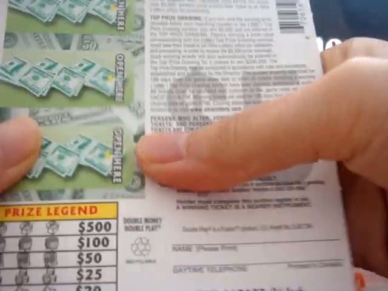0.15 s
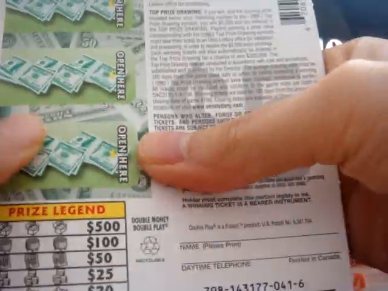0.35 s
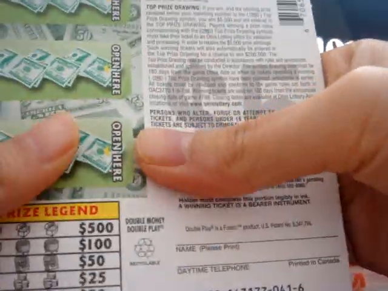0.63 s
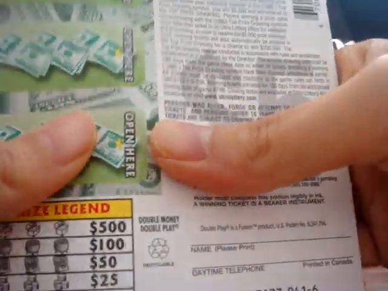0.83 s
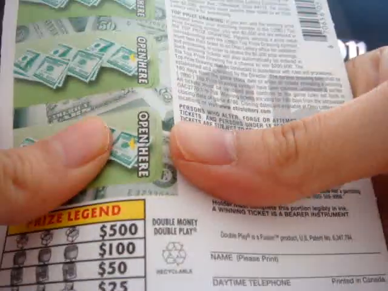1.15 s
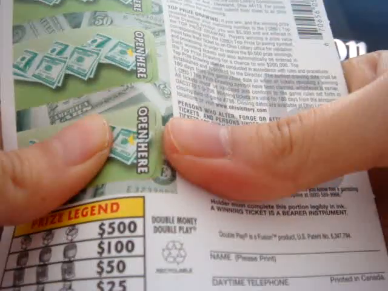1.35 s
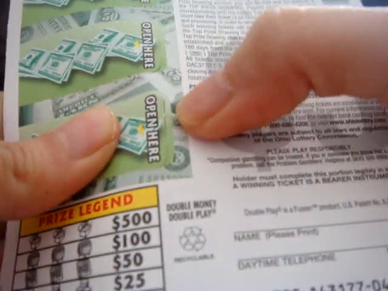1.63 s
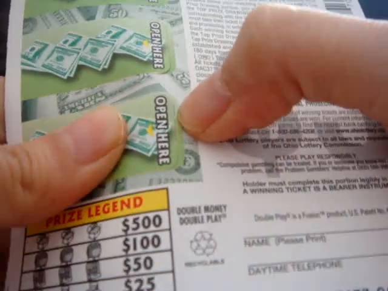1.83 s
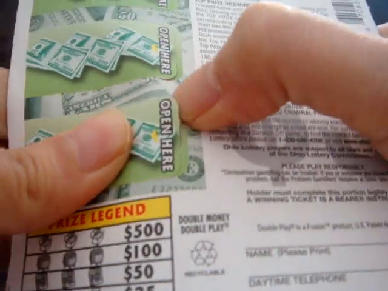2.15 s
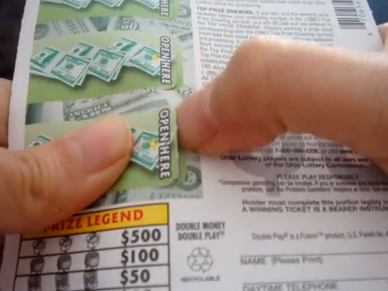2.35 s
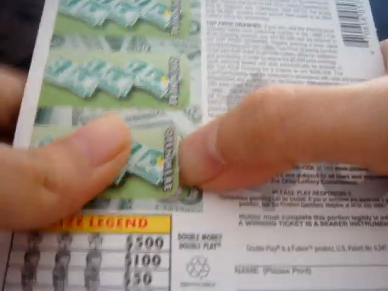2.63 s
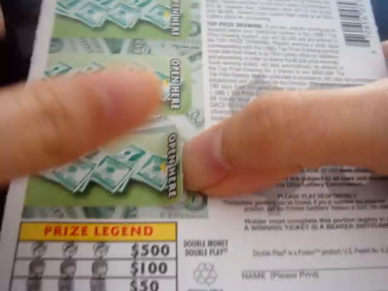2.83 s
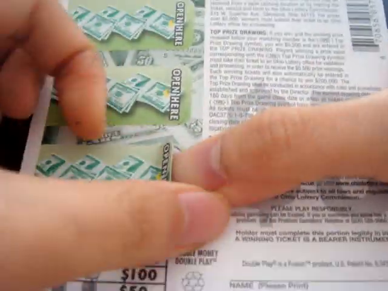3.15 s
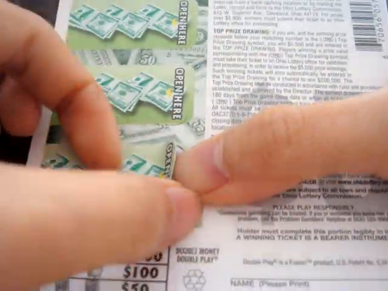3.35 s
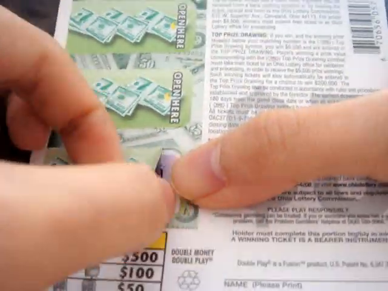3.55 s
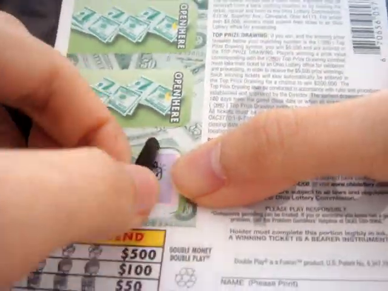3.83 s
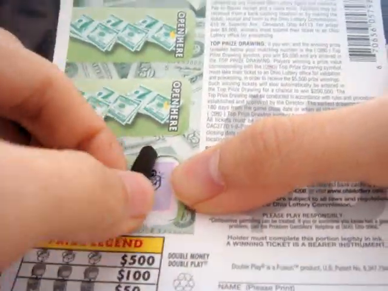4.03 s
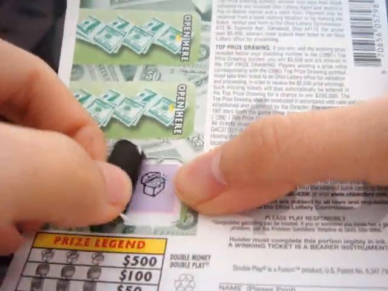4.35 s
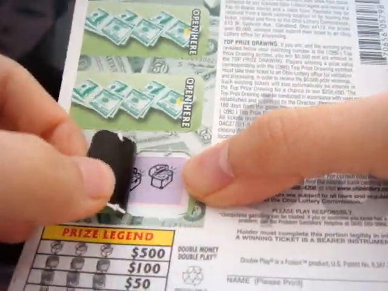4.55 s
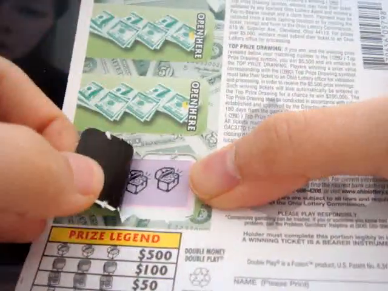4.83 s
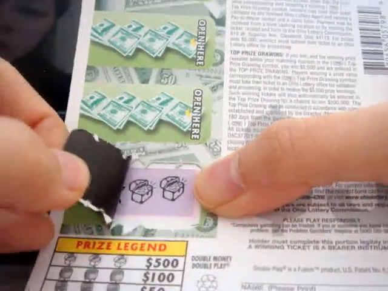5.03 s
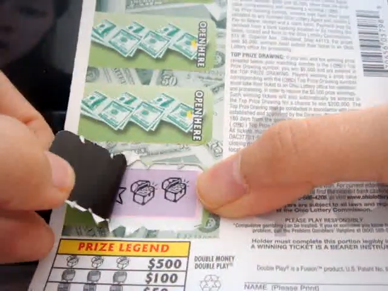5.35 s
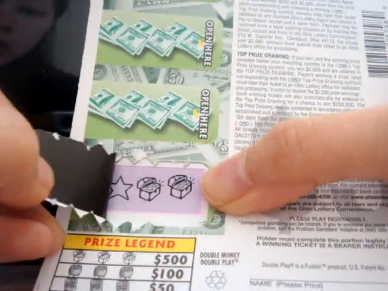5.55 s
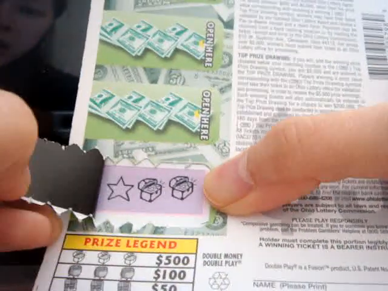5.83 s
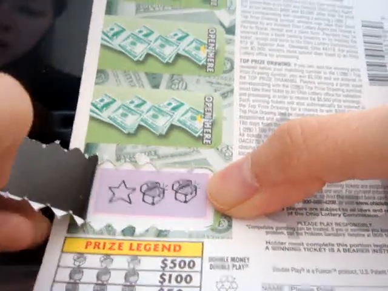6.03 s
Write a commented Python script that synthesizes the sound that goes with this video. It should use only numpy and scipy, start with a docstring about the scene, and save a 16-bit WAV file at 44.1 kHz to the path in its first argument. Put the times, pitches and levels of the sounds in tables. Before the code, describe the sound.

Heard very close in a small, damped space: a thumb bumps and scrapes stiff card with hollow, papery knocks and short rubs. The nail then digs under a tab, flicking and juddering at its edge in denser clicks. After a brief lull the perforations give way in bright crackles and sharp snaps, coming in uneven clusters until the tab is open. Faint still air lies underneath.

```python
"""In a small, damped space, heard from very close, a thumbnail picks at the tab of a cardstock ticket.
Then the tab is peeled back along its perforations. Skin, nail and holding fingers rub: noise made of tiny jerks.
The nail knocks and scrapes, and paper bridges crackle and snap: clicks of noise that ring the stiff sheet.
Soft bumps only flex the card. Faint reflections and still air, which is quiet shaped noise, lie around it all."""
import sys
import numpy as np
from scipy import signal
from scipy.fft import rfft, irfft
from scipy.io import wavfile
from scipy.ndimage import uniform_filter1d, map_coordinates

SR = 44100
rng = np.random.default_rng(int(sys.argv[2]) if len(sys.argv) > 2 else 0)


def to_wav(s):
    """Save 16-bit WAV."""
    ch = np.atleast_2d(s).T  # columns
    pcm = np.round(np.clip(ch, -1, 1) * 32767)  # PCM
    wavfile.write(sys.argv[1], SR, pcm.astype(np.int16))


N = 272538

# the nail is under the edge of the tab from PRY_S; the tab starts to tear at PEEL_S and lies fully open at OPEN_S
PRY_S, PEEL_S, OPEN_S = 2.4, 3.78, 6.1
# the nail has worked the tab loose: from LIFT_S on it stands free by this share of a full lift
LIFT_S, LIFT_SHARE = 3.12, 0.78


def gain_of(db):
    """Turns decibels into a factor."""
    return 10 ** (np.asarray(db) / 20)


def evened(x):
    """Scales a sound to an rms (average strength) of one."""
    return x / np.sqrt(np.mean(x ** 2) + 1e-20)


def read(points, hz):
    """Reads a table between its points, on a log-frequency axis."""
    f, value = np.transpose(points)
    return np.interp(np.log(hz + 1), np.log(f + 1), value)


def add(mix, s, sound):
    """Mixes a sound in, starting at s seconds."""
    part = mix[max(round(s * SR), 0):][:len(sound)]
    part += sound[:len(part)]


def response(spectrum, size=2048):
    """Makes the short response of a body that has this spectrum and answers only after it is struck."""
    hz = abs(np.fft.fftfreq(size, 1 / SR))
    log_gain = np.log(gain_of(read(spectrum, hz)))
    minimum_phase = np.exp(np.conj(signal.hilbert(log_gain)))
    return np.fft.ifft(minimum_phase).real[:size // 2]


def through(x, body):
    """Passes x through the response of a body, at an rms of one."""
    return evened(signal.fftconvolve(x, body)[:len(x)])


def high_pass(x, corner_hz):
    """Removes the bass below the corner frequency."""
    return signal.sosfilt(signal.butter(3, corner_hz, "high", fs=SR, output="sos"), x)


def drift(rate_hz):
    """Wanders smoothly at random, with an rms of one."""
    hz = np.fft.rfftfreq(N, 1 / SR)
    return evened(irfft(rfft(rng.standard_normal(N)) / (1 + (hz / rate_hz) ** 4), N))


def lifted(s):
    """Tells how far the tab stands free of the sheet: it steps up once, on a scale of 0 to 1."""
    return LIFT_SHARE * (s > LIFT_S)


def peeled(s):
    """Tells how much of the tab has been torn loose, 0 to 1."""
    return np.interp(s, [PEEL_S, OPEN_S], [0, 1])


# The tone of the quiet background. Each row: frequency in Hz, relative level in dB.
AIR = [(25, -34), (100, 21.5), (200, 16), (300, 20), (500, 27.5), (1100, 14), (2000, -14), (5000, -93),
       (10000, -20)]


def still_air():
    """Shapes steady noise into the quiet background."""
    return gain_of(-68.5) * through(rng.standard_normal(N), response(AIR))


def slips(per_s, spread_db, smooth):
    """Tiny stick-slip jerks of uneven size lie over a smooth slide."""
    sizes = gain_of(spread_db * np.minimum(rng.exponential(1, N), 4)) * rng.choice([-1, 1], N)
    jerks = evened(sizes * (rng.random(N) < per_s / SR))
    return evened(jerks + smooth * rng.standard_normal(N))


def crackle(per_s, spread_db, count=12):
    """Single paper fibres part, each with a tick of a few cycles at one of several pitches."""
    t = np.arange(256) / SR
    out = np.zeros(N)
    for hz in np.linspace(2200, 9200, count):
        train = np.zeros(N)
        at = np.flatnonzero(rng.random(N) < per_s / count / SR)
        train[at] = gain_of(spread_db * np.minimum(rng.exponential(1, N)[at], 3.5))
        tick = np.sin(2 * np.pi * hz * t) * t * np.exp(-t / 0.00064)
        out += signal.oaconvolve(train, tick)[:N]
    return evened(out)


def catches(per_s, size_db):
    """Now and then an edge catches and lets go: the friction leaps for a millisecond or two."""
    sizes = gain_of(size_db + 3.5 * np.minimum(rng.exponential(1, N), 2.2))
    leaps = (rng.random(N) < per_s / SR) * sizes
    t = np.arange(512) / SR
    return evened(1 + signal.oaconvolve(leaps, np.exp(-t / .0011))[:N])


def yielding(x, limit):
    """Skin gives way before any one jerk can grow into a snap."""
    return evened(np.tanh(evened(x) / limit))


def shifting(x, patchy_db, size=512):
    """The grip changes, so the resonances of the card come and go in patches."""
    z = signal.stft(x, nperseg=size)[2]
    patches = uniform_filter1d(rng.standard_normal(z.shape), size=5, axis=0)  # smooth across pitch
    patches = evened(uniform_filter1d(patches, size=14, axis=1))  # smooth along time
    return evened(signal.istft(z * gain_of(patchy_db * patches), nperseg=size)[1][:N])


def bending(x, depth):
    """The card bends in the hand, so its resonances slide up and down."""
    place = np.cumsum(1 + depth * drift(rate_hz=9))
    return map_coordinates(x, [place], order=3, mode="mirror")


# The holding fingers never rest. Each row: time in seconds, level in dB.
GRIP = [(0, -47.5), (.7, -48.5), (1.35, -51.5), (2.0, -53.5), (2.8, -57), (3.35, -47), (3.8, -54),
        (4.4, -59), (5.3, -63), (6.18, -69)]
# Strokes of skin and nail over the card.
# Each row: start in seconds, length in seconds, level in dB, treble rasp in dB over that level.
STROKES = [(0, 0.0034, -24, -7.5), (0.054, 0.11, -42, -4.5), (0.114, 0.05, -32, -17),
           (0.141, 0.055, -20.5, -10), (0.251, 0.03, -36.5, 5), (0.368, 0.044, -39.5, 5.5),
           (0.417, 0.046, -46.5, 4), (0.466, 0.031, -41.5, 0.5), (0.568, 0.056, -37, -5),
           (0.618, 0.011, -43, -8), (0.682, 0.016, -43.5, 1), (.79, 0.081, -55.5, 6.5),
           (0.978, 0.029, -31, -14), (1.025, 0.037, -21, -15.5), (1.058, 0.057, -34, 2),
           (1.193, 0.024, -35.5, -1.5), (1.416, 0.031, -42.5, -5), (1.522, 0.021, -35.5, -10),
           (1.553, 0.017, -41, -1), (1.603, 0.061, -39, -2), (1.679, 0.017, -31.5, -1.5),
           (1.733, 0.043, -41.5, -4.5), (1.861, 0.031, -41, -8), (1.993, 0.15, -45, -7.5),
           (2.181, 0.011, -30.5, -3), (2.218, 0.054, -38, -6), (2.339, 0.05, -35, -9),
           (2.421, 0.069, -35, -3), (2.608, 0.071, -40.5, -3.5), (2.692, 0.06, -34, -8),
           (2.773, 0.053, -46, -37), (2.865, 0.024, -29.5, -6.5), (2.913, 0.096, -35, -6.5),
           (3.035, 0.052, -36, -10), (3.089, 0.058, -32.5, -14), (3.172, 0.023, -24, -8.5),
           (3.231, 0.043, -41, -13), (3.284, 0.12, -44.5, -17), (3.474, 0.27, -46, -7),
           (3.878, .04, -33, -6.5), (4.106, 0.033, -40, -5.5), (4.195, 0.035, -44.5, 1.5),
           (4.439, 0.048, -34, -3.5), (4.525, 0.062, -36.5, 0.5), (4.664, 0.04, -42, -7),
           (4.786, 0.045, -49.5, 9), (5.118, 0.017, -47, 3), (5.185, 0.04, -48.5, 4),
           (5.27, 0.012, -46, -9), (5.312, 0.084, -48.5, -19), (5.445, 0.068, -50.5, 0),
           (5.581, 0.022, -41.5, 1.5), (6, 0.024, -34, -0.5), (6.141, .04, -42.5, -2)]
STROKE_ATTACK_S, STROKE_SAG_DB, STROKE_RELEASE_T60_S = 0.004, 1, 0.044
GRIP_RASP_DB, GRIP_FLEX_DB, STROKE_FLEX_DB = -4.5, -5.5, -18  # over the level of the grip or stroke
LIFT_FLEX_DB = -2.5  # at a full lift: a free tab passes less of the friction on to the flexing card
# after a snap the freed tab slides on: level over the snap, treble rasp over the slide, rate of dying away
SLIDE_DB, SLIDE_RASP_DB, SLIDE_T60_S = -23, -1, 0.79


def friction(t):
    """Grip, strokes and the sliding tab add their power to drive the sheet, its low flex and its rasp."""
    grip = gain_of(np.interp(t, *np.transpose(GRIP)))
    power = np.outer(gain_of([0, GRIP_FLEX_DB, GRIP_RASP_DB]), grip) ** 2  # rows: sheet, flex, rasp
    age = t[:SR // 2]  # each move lasts half a second at most
    moves = []
    for s, snap_db, *_ in SNAPS:
        moves.append((s, gain_of(snap_db + SLIDE_DB - 60 * age / SLIDE_T60_S), SLIDE_RASP_DB))
    for s, length, db, rasp_db in STROKES:
        sag_db = STROKE_SAG_DB * np.minimum(age / length, 1)  # a positive sag swells the stroke slightly
        release_db = -60 * np.maximum(age - length, 0) / STROKE_RELEASE_T60_S
        attack = np.minimum(age / STROKE_ATTACK_S, 1)
        moves.append((s, attack * gain_of(db + sag_db + release_db), rasp_db))
    for s, level, rasp_db in moves:
        flex_db = STROKE_FLEX_DB + LIFT_FLEX_DB * lifted(s)
        for part, db in zip(power, (0, flex_db, rasp_db)):
            add(part, s, (level * gain_of(db)) ** 2)
    return np.sqrt(power)


# Tones of the card flexing in the hand, the sheet under the thumb, the tab lifted free of the thumb,
# the rubbed surface and the breaking fibres. Each row: frequency in Hz, relative level in dB.
FLEX = [(25, -24.5), (90, -10), (160, -1), (240, 8), (330, 9), (410, 7), (520, 10), (700, 7.5), (1100, -19)]
SHEET = [(300, -42), (520, -16.5), (750, -1.5), (1000, 3), (1170, 7), (1400, 1), (1700, -14), (2100, -8),
         (2600, -13), (4000, -59.5)]
TAB = [(350, -33.5), (800, -10.5), (1150, -2.5), (1400, -7), (1650, -11), (2000, -9.5), (2600, -8.5),
       (4000, -51.5)]
RASP = [(1200, -27.5), (2200, -6.5), (3050, 1), (3900, -7), (5000, -6.5), (6500, -6.5), (8000, -11),
        (10000, -15.5)]
CRACK = [(900, -48.5), (1900, 9.5), (2700, 10), (4000, 10), (5200, 8), (6400, 11), (7600, 10), (10000, 9)]


def rubbing():
    """Uneven friction drives the flexing card, the sheet and the surface rasp."""
    t = np.arange(N) / SR
    sheet_level, flex_level, rasp_level = friction(t)
    picking = t < PEEL_S
    # skin slides with a fine grain; the nail under the tab moves in coarse, separate jerks
    skin = slips(per_s=2000, spread_db=3.6, smooth=.85) * gain_of(1.8 * drift(rate_hz=80))
    nail = slips(per_s=750, spread_db=2.6, smooth=.35) * gain_of(2 * drift(rate_hz=60))
    sliding = np.where((t > PRY_S) & picking, nail, skin)
    # loose fibres crackle in clumps, more so once the tab tears
    fibres = evened(gain_of(3.6 * drift(rate_hz=130)) * crackle(per_s=2400, spread_db=3.4))
    surface = sliding + np.where(picking, .6, 1.1) * fibres
    # the snags are sharpest at the surface; the heavier sheet follows them less
    snags = catches(per_s=np.where(t < PRY_S, 12, 34), size_db=1.5)
    surface = yielding(surface * snags, limit=5)
    push = yielding(sliding * snags ** .7, limit=4.5)
    # rubbing takes on the colour of the tab as it comes free
    free = lifted(t)
    sheet = (1 - free) * through(push, response(SHEET)) + free * through(push, response(TAB))
    rasp = np.where(picking, through(surface, response(RASP)), through(surface, response(CRACK)))
    sound = sheet_level * shifting(bending(sheet, depth=.08), patchy_db=2)
    sound += rasp_level * shifting(rasp, patchy_db=2)
    return sound + flex_level * through(push, response(FLEX))


# How fast reflections fade. Each row: frequency in Hz, time in seconds to fall by 60 dB.
SPACE = [(150, 0.15), (400, 0.22), (1100, 0.081), (3000, 0.12), (9000, 0.0077)]


def tail(first_s, size=8192):
    """Sparse reflections come from nearby surfaces, short and dull."""
    late = np.arange(size) / SR > first_s
    taps = rng.standard_normal(size) * (rng.random(size) < 2500 / SR) * late
    hz, t, z = signal.stft(taps, SR, nperseg=128)
    fade_db = -60 * t / read(SPACE, hz)[:, None]
    echoes = signal.istft(z * gain_of(fade_db), SR, nperseg=128)[1]
    return signal.sosfilt(signal.butter(1, 3500, fs=SR, output="sos"), echoes / np.linalg.norm(echoes))


def space(x, wet_db, count=7):
    """The hands and the ticket move, so one pattern of reflections fades into the next."""
    place = np.linspace(0, count - 1, N)
    wet = np.zeros(N)
    for k in range(count):
        share = np.sqrt(np.maximum(1 - abs(place - k), 0))
        wet += signal.oaconvolve(x * share, tail(first_s=0.0032))[:N]
    return gain_of(wet_db) * wet


def ripple(depth_db, size=256):
    """Random hills and dips in the treble: every spot on the card has its own colour."""
    hz = np.geomspace(1500, 11000, num=12)
    return response(np.column_stack([hz, depth_db * rng.standard_normal(len(hz))]), size=size)


# Ways the whole sheet can bend and ring; chance shifts pitch and level a little at every click.
# Each row: basic frequency in Hz, time in seconds to fall by 60 dB, basic relative level in dB.
CARD_MODES = [(325, .03, -6.5), (508, 0.12, 10.5), (790, 0.0033, -32), (1115, 0.027, 27.5),
              (1311, 0.05, 13), (1693, 0.017, 15), (2000, 0.0039, -29)]
BURST_S, CLUMP_DB = .0007, 4.5  # decay of the final burst, unevenness of the fibres before and after it
# the struck spot: level over the sheet's modes, decay; how fast the modes weaken away from its pitch
SPOT_DB, SPOT_T60_S, MODE_DB_PER_OCTAVE = 6, 0.0093, 11.5


def click(ring_db, ring_hz, flex_db, crack_db, spread, flex, rasp, crack, size=1024):
    """Fibres give way in clumps, the rest break in one burst; the spot jumps and sets the sheet ringing."""
    t = np.arange(size) / SR
    lead = size // 4  # room for fibres that break before the jump
    age = t - t[lead]
    crowd = np.exp(-abs(age) / max(spread, 1e-4))
    clumps = gain_of(CLUMP_DB * evened(uniform_filter1d(rng.standard_normal(size), size=40)))
    fibres = rng.standard_normal(size) * clumps * crowd
    fibres /= np.linalg.norm(fibres)
    burst = rng.standard_normal(size) * (age >= 0) * np.exp(-abs(age) / BURST_S)
    burst /= np.linalg.norm(burst)
    jump = signal.unit_impulse(size, lead)
    # the struck spot rings briefly at its own pitch, among the modes of the whole sheet
    spot = gain_of(-60 * t / SPOT_T60_S) * np.cos(2 * np.pi * ring_hz * t)
    modes = np.zeros(size)
    for hz, t60, db in CARD_MODES:
        mode_db = db - MODE_DB_PER_OCTAVE * abs(np.log2(hz / ring_hz)) + 2 * rng.standard_normal()
        mode_hz = hz * rng.uniform(0.947, 1.12)
        modes += gain_of(mode_db - 60 * t / t60) * np.cos(2 * np.pi * mode_hz * t)
    ring = gain_of(SPOT_DB) * evened(spot) + evened(modes)
    # soft knocks rasp dully, hard breaks crack brightly
    hardness = np.clip(1.5 + crack_db / 16, 0, 1)
    treble = (1 - hardness) * evened(rasp) + hardness * evened(crack)
    treble = np.convolve(treble, ripple(depth_db=2.2))
    sound = through(jump + 0.81 * fibres, high_pass(ring, corner_hz=433))
    sound += gain_of(flex_db) * through(jump + 0.34 * fibres, flex)
    sound += gain_of(crack_db) * through(0.31 * jump + burst + fibres, treble)
    return -t[lead], gain_of(ring_db) * sound


# The high note of the torn edge changes as the tab comes away. Each row: time in seconds, pitch in Hz.
CRACK_PITCH = [(4.48, 8350), (4.7, 6280), (5.76, 6930), (6, 7900)]
EDGE_RING_DB, EDGE_Q = -1.5, 11.6  # level and sharpness of that note


def played(blows):
    """Lets a list of blows ring the card; once it tears, the torn edge adds its own high note."""
    out = np.zeros(N)
    flex, rasp, crack = response(FLEX), response(RASP), response(CRACK)
    for s, *blow in blows:
        edge_hz = np.interp(s, *np.transpose(CRACK_PITCH))
        edge = signal.lfilter(*signal.iirpeak(edge_hz, EDGE_Q, fs=SR), crack)
        edged_crack = crack + (s > PEEL_S) * gain_of(EDGE_RING_DB) * edge
        early, sound = click(*blow, flex, rasp, edged_crack)
        add(out, s + early, sound)
    return out


# The thumb knocks on the card. Each row: time in seconds, ring level in dB before the soft pad dulls it,
# low flex in dB over the ring, spread of the contact in seconds.
KNOCKS = [(0.1578, -20, -11.5, 0.019), (0.168, -20.5, -7.5, 0.018), (0.1905, -30.5, -4, 0.0093),
          (0.2392, -18, -8, 0.00076), (0.2725, -25, -7, 0.00068), (0.3567, -33, -5, 0.0045),
          (1.0328, -20, -5.5, 0.0004), (1.0368, -24, -11, 0.0026), (1.0452, -21, -12.5, 0.001),
          (1.0563, -22, -7.5, 0.0041), (1.0601, -22.5, -7, .002), (1.6505, -25.5, -17, 0.0014),
          (1.6965, -28.5, -7, 0.014), (2.7189, -33, -1.5, 0.0064), (2.828, -22.5, -14, 0.0035),
          (2.8459, -35, -3, .001), (2.8685, -27, -7.5, 0.0014), (2.8877, -26.5, -16, 0.0035)]
KNOCK_HZ, KNOCK_CRACK_DB = 1045, -12  # ring pitch, treble crack over the ring
PAD_HZ = 2420  # the soft pad of the thumb dulls its knocks above this


def knocks():
    """The thumb strikes the card and rings it, and its soft pad takes off the treble."""
    blows = [(s, db, KNOCK_HZ, flex_db, KNOCK_CRACK_DB, spread) for s, db, flex_db, spread in KNOCKS]
    return signal.sosfilt(signal.butter(2, PAD_HZ, fs=SR, output="sos"), played(blows))


# A fingertip and the card bump softly together. Each row: time in seconds, level in dB.
BUMPS = [(0.357, -38.5), (0.896, -40.5), (2.817, -41), (2.839, -51), (2.87, -36.5), (3.033, -49.5),
         (4.448, -49), (4.468, -43), (5.014, -43.5), (5.036, -46)]
BUMP_CONTACT_S = 0.0031


def bumps():
    """A soft pad pushes too slowly to ring the sheet; it only flexes the card."""
    out, t = np.zeros(N), np.arange(1024) / SR
    push = t * np.exp(-3 * t / BUMP_CONTACT_S)
    for s, db in BUMPS:
        add(out, s, gain_of(db) * evened(high_pass(through(push, response(FLEX)), corner_hz=150)))
    return out


# The nail flicks off the edge of the tab. Each row: time in seconds, ring level in dB,
# treble crack in dB over the ring, spread of the contact in seconds.
FLICKS = [(0.5288, -34, -15, 0.0034), (0.6824, -38.5, -4, 0.0013), (0.9902, -38, -21, 0.0017),
          (1.2295, -41.5, -18, .001), (1.5416, -42, -14, 0.00077), (1.6635, -34.5, -7, .002),
          (1.812, -47, -23, 0.00036), (1.843, -42, -25, 0.00045), (2.05, -35.5, -17, 0.00063),
          (2.071, -33, -0.5, 0.0019), (2.163, -27, 4.5, 0.0023), (2.1854, -36, -21, 0.00045),
          (2.194, -36.5, -6, 0.00092), (2.389, -37, -18, 0.0013), (2.4238, -19.5, -3.5, 0.00075),
          (2.75, -48, -18, 0.0013), (2.7721, -29, -35, 0.0019), (2.8277, -40, 6, 0.0011),
          (2.9833, -28.5, -14, 0.00076), (3.1006, -28, -30, 0.0044), (3.1355, -37, -13, 0.00034),
          (3.138, -30.5, -25, 0.001), (3.1487, -44, -17, 0.00045), (3.155, -35.5, -20, 0.0004),
          (3.158, -51, -16, .0004), (3.175, -37, -8, 0.0005), (3.178, -33, -20, 0.0014),
          (3.2057, -32, -7.5, .0003), (3.2975, -36.5, -18, 0.0014), (3.3082, -40, -6, 0.0025),
          (3.3818, -45.5, -16, 0.0012), (3.391, -43.5, -20, .0005), (3.471, -45, -10, 0.0011),
          (3.478, -33.5, -18.5, 0.0005)]
FLICK_HZ, FLICK_FLEX_DB = 1100, -18  # ring pitch before the lift, low flex over the ring
LIFT_RISE_HZ = 380  # how much higher a tab at a full lift would ring


def flicks():
    """The nail slips off the edge and rings the card, at a higher pitch once the tab stands free."""
    return played([(s, db, FLICK_HZ + LIFT_RISE_HZ * lifted(s), FLICK_FLEX_DB, crack_db, spread)
                   for s, db, crack_db, spread in FLICKS])


# The nail judders along the perforation. Each row: time in seconds, ring level in dB.
JUDDERS = [(2.4732, -38), (2.5025, -36), (2.5464, -41.5), (2.5886, -36.5), (2.6156, -42.5)]
JUDDER_HZ, JUDDER_FLEX_DB, JUDDER_CRACK_DB, JUDDER_SPREAD_S = 1000, -1.5, -15, 0.006


def judders():
    """The juddering nail gives a string of dull clicks with a strong low flex."""
    return played([(s, db, JUDDER_HZ, JUDDER_FLEX_DB, JUDDER_CRACK_DB, JUDDER_SPREAD_S) for s, db in JUDDERS])


TEAR_FROM_S, TEAR_TO_S = 3.25, 5.52  # the tab is under steady pull between these times
# stray fibres: how often, lowest ring level, spread of sizes above it, pitch, treble crack over the ring
STRAY_PER_S, STRAY_DB, STRAY_SIZE_DB, STRAY_HZ, STRAY_CRACK_DB = 40, -64.5, 3.5, 1390, 8
TICK_SPREAD_S = 0.0014  # how long a fibre or small strand takes to part


def strays():
    """Single fibres along the tear let go at random, as small blows."""
    pull_s = TEAR_TO_S - TEAR_FROM_S
    draws = rng.random((round(STRAY_PER_S * pull_s), 2))
    times = TEAR_FROM_S + pull_s * draws[:, 0]
    sizes = np.minimum(-np.log(1 - draws[:, 1]), 3)  # many small, few large
    return played([(s, STRAY_DB + STRAY_SIZE_DB * size, STRAY_HZ, SNAP_FLEX_DB, STRAY_CRACK_DB, TICK_SPREAD_S)
                   for s, size in zip(times, sizes)])


# Small strands part between the bridges.
# Each row: time in seconds, ring level in dB, treble crack in dB over the ring.
TICKS = [(3.5275, -46, 5.5), (3.551, -55, 9), (3.56, -45.5, 6.5), (3.6033, -45.5, 8), (3.8304, -55, 11),
         (3.8485, -59, 17), (3.9264, -43, -14), (3.9374, -47, -10), (3.9799, -44.5, -12), (4.2472, -57, 11),
         (4.279, -51.5, 12.5), (4.3003, -40, -7), (4.6568, -51.5, 15.5), (4.6913, -44, 8), (4.7087, -50, 5),
         (4.767, -44, -14), (4.838, -46, 7), (4.852, -53, 8), (4.8655, -40.5, 2), (4.8959, -50, 6),
         (4.9094, -52, 9), (4.926, -54, 3), (4.9964, -42.5, 0), (5.0765, -52.5, 18), (5.1052, -51, 10),
         (5.1323, -55, 18), (5.146, -42, -1), (5.3536, -41, 3), (5.3819, -45, 5), (5.4382, -42.5, -3),
         (5.4883, -50, 10)]


def ticks():
    """Each small strand parts as a light click, at the pitch of the stray fibres."""
    return played([(s, db, STRAY_HZ, SNAP_FLEX_DB, crack_db, TICK_SPREAD_S) for s, db, crack_db in TICKS])


# Paper bridges snap. Each row: time in seconds, ring level in dB, ring pitch in Hz,
# treble crack in dB over the ring, spread of the breaking fibres in seconds.
SNAPS = [(3.8169, -47.5, 1500, 16, 0.003), (3.824, -39.5, 1430, 5, 0.0012), (3.8796, -24, 1770, 5, 0.0054),
         (4.3146, -22.5, 1144, 6.5, 0.0035), (4.3255, -38, 1500, 6, 0.0032),
         (4.437, -32.5, 1210, 5, 0.0043), (4.4452, -34, 1760, 6, 0.003), (4.456, -45, 1300, 5, 0.00092),
         (4.464, -28.5, 1230, 5, 0.0035), (4.4731, -30.5, 1360, 1, 0.003), (4.476, -43, 1390, 9, .0006),
         (4.4785, -34.5, 1710, 14.5, .0007), (4.486, -46, 1400, 1, .001),
         (4.511, -29.5, 1320, 9.5, 0.00064), (4.513, -21, 1120, -9, 0.002),
         (4.5625, -44, 1280, 12.5, 0.0023), (4.7, -50, 1447, 20, 0.0006), (4.7054, -38, 1430, 3, 0.0023),
         (4.7289, -27, 1570, 13.5, 0.0017), (4.7506, -28, 1760, 12.5, 0.0021),
         (5.0116, -20.5, 1880, 7, 0.0008), (5.017, -35, 1290, 10, 0.0023),
         (5.0211, -25.5, 1350, 5, 0.00065), (5.032, -38, 2000, 14, 0.0011), (5.036, -23, 1680, -3, 0.0017),
         (5.0578, -30, 1180, 4, .005), (5.0817, -36, 1200, 6.5, 0.00065), (5.1604, -23, 1690, 6.5, 0.0011),
         (5.184, -32.5, 1900, 4, 0.0079), (5.2745, -38.5, 1270, 4.5, 0.0074),
         (5.3254, -35.5, 1210, 3, 0.0015), (5.3642, -46, 1120, 11, 0.00076),
         (5.369, -34.5, 1170, -3, 0.0011), (5.4593, -34.5, 1160, -0.5, 0.0056),
         (5.567, -26.5, 1900, 6.5, 0.0059), (5.5695, -22.5, 1140, 0, 0.0051),
         (5.5758, -24.5, 1100, 2, 0.00087), (5.615, -23.5, 1060, 4, 0.0038),
         (5.7533, -30, 1900, 9.5, 0.00069), (5.7556, -25, 1400, 7.5, 0.0017),
         (5.785, -21.5, 1305, 2.5, 0.0013), (5.98, -21, 1220, 2.5, 0.00094), (6.0274, -38, 1290, 2, .001),
         (6.035, -26, 1330, 2.5, 0.0011), (6.0403, -28.5, 1270, 4, 0.0015)]
# low flex over the ring, and its change by the time the tab is open: a long tab passes less of each snap on
SNAP_FLEX_DB, LONG_TAB_FLEX_DB = -17.5, -5


def snaps():
    """Each breaking bridge cracks and rings the sheet, with less low flex as the tab grows longer."""
    return played([(s, db, hz, SNAP_FLEX_DB + LONG_TAB_FLEX_DB * peeled(s), crack_db, spread)
                   for s, db, hz, crack_db, spread in SNAPS])


SHADE_FROM_S, SHADE_TO_S, SHADE_HZ = 4.49, 4.7, 8820


def shaded(x):
    """The raised tab curls over the tear and shades its top treble."""
    share = np.interp(np.arange(N) / SR, [SHADE_FROM_S, SHADE_TO_S], [0, 1])
    dull = signal.sosfiltfilt(signal.butter(2, SHADE_HZ, fs=SR, output="sos"), x)
    return (1 - share) * x + share * dull


def scene():
    """Sums the handled card, its reflections and the still air."""
    air = still_air()
    nail_and_thumb = knocks() + bumps() + flicks() + judders()
    tearing = strays() + ticks() + snaps()
    card = shaded(rubbing() + nail_and_thumb + tearing)
    return (card + space(card, wet_db=-19.5) + air)[None]


def record(dry):
    """Rounds off the sharpest peaks, then removes what lies above the band limit."""
    ceiling = .62
    rounded = dry / (1 + (dry / ceiling) ** 4) ** .25
    band_limit = signal.firwin(511, 10150, window=("kaiser", 8), fs=SR)  # cutoff in Hz
    return signal.oaconvolve(rounded, band_limit[None], "same")


dry = scene()
out = record(dry)
to_wav(out)
```